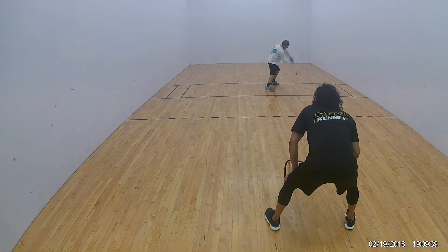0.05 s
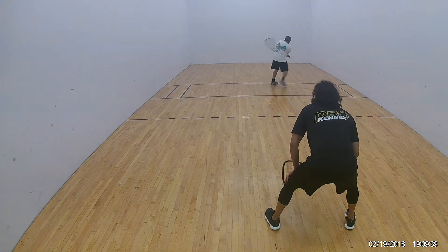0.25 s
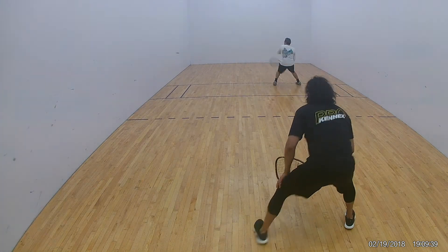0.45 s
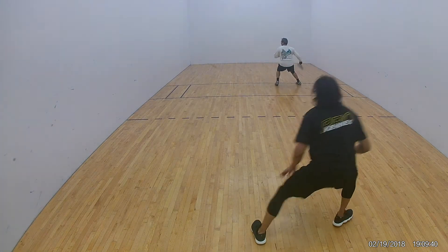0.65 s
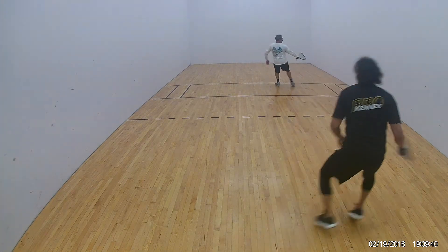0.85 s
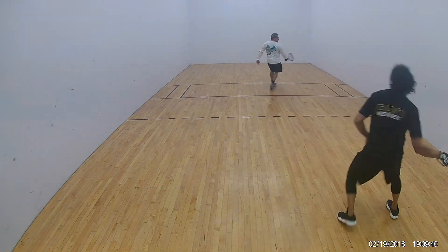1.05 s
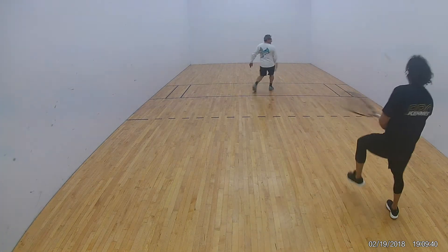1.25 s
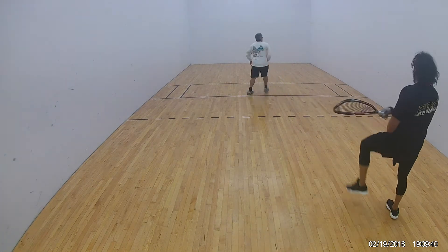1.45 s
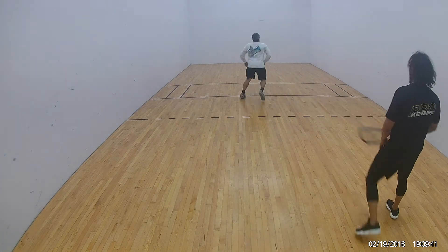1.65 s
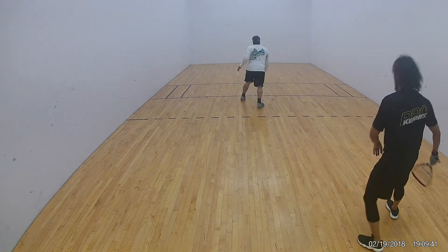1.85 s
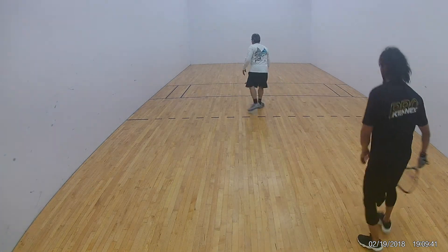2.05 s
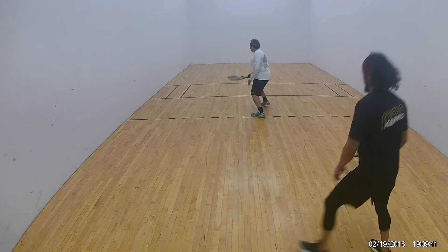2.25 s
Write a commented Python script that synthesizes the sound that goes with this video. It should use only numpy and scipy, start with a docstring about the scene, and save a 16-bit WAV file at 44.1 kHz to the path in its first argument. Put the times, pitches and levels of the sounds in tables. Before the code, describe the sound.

A racquetball is smacked by a racquet and at once cracks against the wall, ringing through an enclosed court. Shoes squeak, steps thud on the wood floor and the ball bounces twice more softly, over a steady ventilation hum.

```python
"""A racquetball rally in a closed, hard-walled court that rings for about four seconds.
Over the hum of the ventilation, a racquet smacks the hollow rubber ball, which at once cracks against
the front wall. Rubber soles squeak as they stick and slip, then steps thud on the wood floor.
The ball bounces twice, with more squeaks in between, and at the end the floor rumbles underfoot."""
import sys
import numpy as np
from scipy import signal
from scipy.fft import rfft, irfft
from scipy.io import wavfile
from scipy.ndimage import uniform_filter1d, minimum_filter1d

SR = 44100
rng = np.random.default_rng(int(sys.argv[2]) if len(sys.argv) > 2 else 0)


def master(y):
    """Save y as 16-bit WAV."""
    cut = np.clip(np.atleast_2d(y).T, -1, 1)
    pcm = np.round(cut * 32767)  # scale
    wavfile.write(sys.argv[1], SR, pcm.astype(np.int16))


N = 101429


def amp(db):
    """Turns decibels into a number to multiply by."""
    return 10 ** (np.asarray(db) / 20)


def read(points, hz):
    """Looks up a table's value at any frequency, on a log-frequency axis."""
    f, value = np.transpose(points)
    return np.interp(np.log(hz + 1), np.log(f + 1), value)


def add(mix, s, sound):
    """Mixes a sound in, starting at s seconds."""
    part = mix[max(round(s * SR), 0):][:len(sound)]
    part += sound[:len(part)]


def noise(gain):
    """Noise of average size (rms) 1; gain(f) says how strong each frequency is."""
    shaped = irfft(rfft(rng.standard_normal(N)) * gain(np.fft.rfftfreq(N, 1 / SR)), N)
    return shaped / np.sqrt(np.mean(shaped ** 2) + 1e-20)


def blow(colour, modes=(), size=8192):
    """One knock: a sudden pulse with the given tone colour, plus the notes (modes) it sets ringing."""
    log_gain = np.log(amp(read(colour, abs(np.fft.fftfreq(size, 1 / SR)))))
    pulse = np.fft.ifft(np.exp(np.conj(signal.hilbert(log_gain)))).real  # energy comes at the start
    pulse /= np.linalg.norm(pulse)
    t = np.arange(size) / SR
    out = pulse.copy()
    for hz, db, fade_s in modes:
        note = np.cos(2 * np.pi * hz * t) * np.exp(-np.log(1000) * t / fade_s)
        ring = signal.fftconvolve(pulse, note)[:size]
        out += amp(db) * ring / np.linalg.norm(ring)
    return out


def echo_cluster(size=1024, spread_s=.0065):
    """One echo is a few milliseconds of scattered reflections."""
    t = np.arange(size) / SR
    window = np.exp(-(t / spread_s) ** 2)
    burst = rng.standard_normal(size) * window
    for _ in range(4):  # even out the frequencies while keeping the burst short
        burst = irfft(np.exp(1j * np.angle(rfft(burst)))) * np.sqrt(window)
    return burst / np.linalg.norm(burst)


def court(sound, echoes, build_s):
    """The walls throw a sound back: first single echoes, then a tail that builds up and dies away."""
    # how long the court rings: f/Hz, time to fade by 60 dB/s
    ring_times = [(60, 3.2), (250, 3.77), (500, 5), (1000, 6), (1400, 3.78), (2000, 4.24), (3000, 3.73),
                  (4100, 3.28), (6000, 1.8), (8500, 1.1), (9600, .55), (12000, .45)]
    hz, frame_s, bands = signal.stft(rng.standard_normal(N), SR, nperseg=512)
    decay = np.exp(-np.log(1000) * frame_s / read(ring_times, hz)[:, None])
    response = signal.istft(bands * decay, SR, nperseg=512)[1][:N]
    t = np.arange(N) / SR
    early_dip = amp(-2.5 * np.exp(-t / .19))  # the tail starts a little weaker
    response *= (1 - np.exp(-t / build_s)) * early_dip
    resonance_q = 1.98  # each echo loses its treble above a soft peak at top_hz
    for delay, db, top_hz in echoes:
        w = 2 * np.tan(np.pi * min(top_hz, SR / np.e) / SR)
        lowpass = signal.bilinear([w * w], [1, w / resonance_q, w * w])
        echo = signal.lfilter(*lowpass, echo_cluster())
        add(response, delay, amp(db) * np.sqrt(SR / 100) * echo)
    return signal.fftconvolve(sound, response)[:N]


def ventilation():
    """Moving air rushes steadily under a few wavering tones."""
    # tone colour of the air: f/Hz, level/dB
    air_colour = [(15, -20.5), (30, 0.5), (45, -14.5), (100, 3.5), (170, -5), (400, 2.5), (650, 1.5),
                  (1000, 4), (1500, 1.5), (1900, -2), (2300, -17.5), (3200, -19.5), (4300, -27.5),
                  (6000, -33), (8000, -38), (12000, -39), (15500, -36)]
    # humming tones: f/Hz, start level/dB, end level/dB, waver/Hz
    hum_tones = [(30, -69, -66.5, 1.7), (466.3, -50, -61, 1.3), (554.5, -55, -52, 0.74), (956, -62, -59, 3),
                 (1069, -62.5, -60, 5.6), (1490, -58, -58.5, 3.8)]
    out = amp(-49) * noise(lambda f: amp(read(air_colour, f)))
    for hz, start_db, end_db, waver_hz in hum_tones:
        waver = noise(lambda f: 1 / (1 + (f / 6) ** 4))
        phase = 2 * np.pi * np.cumsum(hz + waver_hz * waver) / SR
        out += amp(np.linspace(start_db, end_db, N)) * np.sqrt(2) * np.sin(phase)
    return out


def floor_rumble(start_s=1.85, rise_s=.4, hz=38):
    """The floor shakes as the near player walks."""
    t = np.arange(N) / SR
    rumble = noise(lambda f: (f / hz) ** 2 / (1 + (f / hz) ** 4))
    return amp(-57.5) * np.clip((t - start_s) / rise_s, 0, 1) * rumble


def steps():
    """Each step is a thud of the springy boards and a slap of the sole."""
    # steps: t/s, thud level/dB, slap level/dB, slap's direct sound/dB, its treble limit/Hz
    footfalls = [(.948, -54, -70.5, 13, 10500), (1.2208, -35.5, -64, 5, 6520),
                 (1.392, -40, -65.5, -6, 4020), (1.422, -39.5, -55, -3.5, 6000),
                 (1.749, -43.5, -65.5, 3, 5000), (1.824, -39, -74, -0.5, 5000),
                 (2.137, -47.5, -71, -1.5, 5000)]
    # tone colours of thud and slap: f/Hz, level/dB
    thud_colour = [(30, -19), (70, -15.5), (120, -12.5), (280, 0), (450, -7), (600, -4.5), (1000, 4.5),
                   (1750, 7.5), (2300, -12), (4000, -26.5), (8000, -73)]
    slap_colour = [(300, -20.5), (3000, 14.5), (6000, 1), (8000, -17), (10500, -6), (12000, -20.5),
                   (15000, -34)]
    # the thud's direct sound: delay/s, level/dB, treble limit/Hz
    thud_direct = [(.001, -1, 1500)]
    thud, slap = blow(thud_colour), blow(slap_colour)
    out = np.zeros(N)
    for s, thud_db, slap_db, direct_db, top_hz in footfalls:
        slap_echoes = [(0, direct_db, top_hz), (.006, direct_db - 4.5, top_hz)]
        add(out, s, amp(thud_db) * court(thud, thud_direct, build_s=.0088))
        add(out, s, amp(slap_db) * court(slap, slap_echoes, build_s=.011))
    return out


def squeaks(jitter_depth=.022, rough_db=.5, fade_s=.004, harmonics_db=(-1.5, -35, -38)):
    """Rubber sticks and slips on varnish: a short, shaky, gliding whistle with weak overtones."""
    # squeaks: t/s, length/s, level/dB, start f/Hz, middle f/Hz, end f/Hz, direct sound/dB
    slips = [(0.446, .035, -44, 4135, 3982, 4037, 1), (0.458, .05, -48.5, 4240, 4255, 4300, 6.5),
             (1.647, 0.023, -48.5, 4420, 4280, 4110, 8.5), (1.660, .026, -46, 4130, 3830, 3794, 7),
             (1.686, 0.023, -46.5, 3960, 4103, 4140, 10), (1.678, .014, -55, 5010, 4700, 4610, 8)]
    # echoes off the side and back walls: delay/s, level/dB, treble limit/Hz
    echoes = [(.075, -3, 8000), (.11, -5.5, 5000), (.16, -6.5, 5000)]
    out = np.zeros(N)
    for s, length, db, start_hz, mid_hz, end_hz, direct_db in slips:
        t = np.arange(0, length, 1 / SR)
        hz = np.polyval(np.polyfit([0, .5, 1], [start_hz, mid_hz, end_hz], 2), t / length)
        jitter = noise(lambda f: 1 / (1 + (f / 400) ** 2))[:len(t)]
        phase = 2 * np.pi * np.cumsum(hz * (1 + jitter_depth * jitter)) / SR
        tone = sum(amp(part_db) * np.sin(k * phase) for k, part_db in enumerate(harmonics_db, 1))
        tone *= np.sin(np.pi / 2 * np.clip(np.minimum(t, length - t) / fade_s, 0, 1)) ** 2
        tone *= amp(rough_db * noise(lambda f: 1 / (1 + (f / 200) ** 2))[:len(t)])
        tone /= np.linalg.norm(tone)
        add(out, s, amp(db) * court(tone, [(0, direct_db, 7300)] + echoes, build_s=.019))
    return out


def floor_bounces(ring_hz=924, ring_s=.047):
    """The ball lands more softly on the wood floor and rings briefly on one note."""
    # bounces: t/s, level/dB, tail build-up/s, echo strength/dB, ring of the ball/dB
    bounces = [(1.285, -35, 0.021, -10, -7), (1.7204, -37, 0.018, -4, 2.5)]
    # direct sound and echoes: delay/s, level/dB, treble limit/Hz
    paths = [(.001, 0, 6000), (.031, 1, 1106), (.046, 0, 1600), (.082, 1, 1000), (.19, -1, 1000),
             (.279, -1, 1000)]
    # tone colour of a bounce: f/Hz, level/dB
    colour = [(50, -25), (300, -12.5), (600, -13), (830, -6), (930, -5), (1060, -4.5), (1400, -4.5),
              (1800, -3.5), (2200, -24), (3100, -21), (3700, -31.5), (5000, -34), (8000, -56.5),
              (15000, -73)]
    out = np.zeros(N)
    for s, db, build_s, echo_db, ring_db in bounces:
        echoes = [(delay, path_db + echo_db, top_hz) for delay, path_db, top_hz in paths]
        knock = blow(colour, [(ring_hz, ring_db, ring_s)])
        add(out, s, amp(db) * court(knock, echoes, build_s))
    return out


def racquet_smack(start_s=.186):
    """The racquet strikes the ball with one sharp blow."""
    # tone colour of the smack: f/Hz, level/dB
    colour = [(50, -44), (200, -17), (430, -13.5), (560, -23), (900, -6), (1150, 0.5), (1500, -10),
              (1830, 0.5), (2200, -17.5), (2700, -25), (3200, -14.5), (3700, -29.5), (4400, -27.5),
              (5400, -35.5), (6000, -35.5), (7000, -47.5), (8000, -60), (10000, -63), (15000, -72)]
    # direct sound and first echoes: delay/s, level/dB, treble limit/Hz
    echoes = [(.0005, -16, 4000), (.007, -8, 5000), (.031, -7.5, 9000), (.034, -4, 1800),
              (.038, -3.5, 1400), (0.043, -5.5, 5000), (.055, -8, 2000), (.063, -7, 1900), (.074, -9, 1200)]
    out = np.zeros(N)
    add(out, start_s, amp(-22.5) * court(blow(colour), echoes, build_s=.025))
    return out


def wall_crack(start_s=.3165):
    """The ball hits the front wall so hard that its hollow shell rings."""
    # tone colour of the crack: f/Hz, level/dB
    colour = [(50, -24), (160, -20), (300, -14.5), (600, -11.5), (800, -6), (1000, -5.5), (1200, 0.5),
              (1480, -2.5), (1750, -0.5), (1950, -6), (2170, -16.5), (2380, -12), (2720, -24.5),
              (3100, -19), (3650, -32.5), (4300, -24), (5400, -38.5), (6000, -35.5), (7100, -51.5),
              (7900, -63), (8700, -52.5), (10000, -49), (11500, -54.5), (15000, -76)]
    # notes of the shell: f/Hz, level against the blow/dB, time to fade by 60 dB/s
    shell_modes = [(1226, -13.5, .18), (1323, -13, 0.16), (1454, -26, 0.056), (1716, -16.5, 0.063),
                   (1900, -21.5, 0.085), (2476, -33, .06), (3026, -29.5, 0.22)]
    # direct sound and first echoes: delay/s, level/dB, treble limit/Hz
    echoes = [(.0005, -3.5, 8000), (.011, -2.5, 7000), (.021, -2.5, 1800), (0.027, -5, 1600),
              (.038, -7, 3000), (0.046, 5, 1400), (.054, 2.5, 1350), (0.074, -6, 1400), (.079, 2, 1300)]
    out = np.zeros(N)
    add(out, start_s, amp(-21) * court(blow(colour, shell_modes), echoes, build_s=.024))
    return out


def scene():
    """Ball and shoes, coloured by one small microphone, over the background."""
    # ripples in the microphone's treble: f/Hz, gain/dB
    treble_ripples = [(4900, 0), (5450, -2.5), (5900, 2.5), (6700, -3.5), (7500, 5), (7950, -11.5),
                      (8500, 5), (9200, -4.5), (10500, -1.5), (11500, -0.5), (13000, -7)]
    rally = racquet_smack() + wall_crack() + floor_bounces() + steps() + squeaks()
    gain = amp(read(treble_ripples, np.fft.rfftfreq(2 * N, 1 / SR)))
    heard = irfft(rfft(rally, 2 * N) * gain)[:N]
    return (heard + ventilation() + floor_rumble())[None]


def record(dry, limit_db=-9.5, hold_s=.0028, top_hz=15800):
    """A limiter holds down the loudest peaks, then a filter cuts the highest treble."""
    size = int(hold_s * SR)
    gain = np.minimum(1, amp(limit_db) / (abs(dry) + 1e-9))
    limited = dry * uniform_filter1d(minimum_filter1d(gain, size), size)
    return signal.sosfilt(signal.ellip(10, .1, 80, top_hz, fs=SR, output="sos"), limited)


dry = scene()
out = record(dry)
master(out)
```